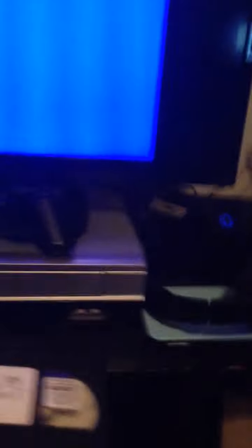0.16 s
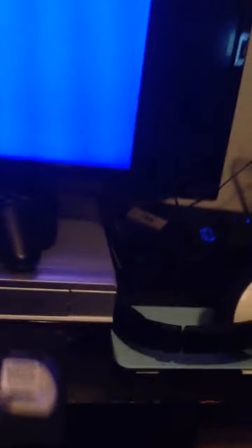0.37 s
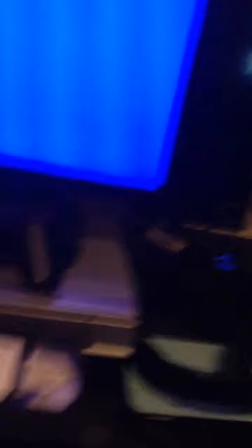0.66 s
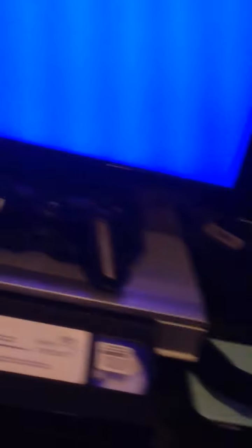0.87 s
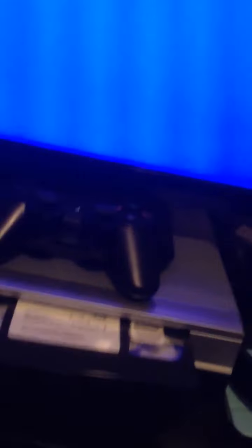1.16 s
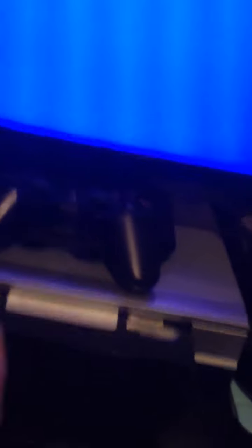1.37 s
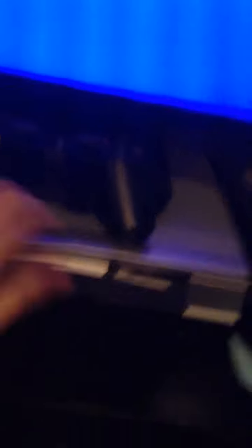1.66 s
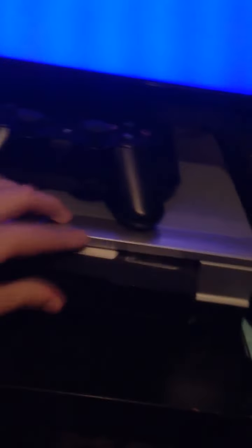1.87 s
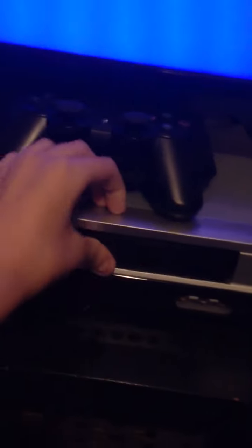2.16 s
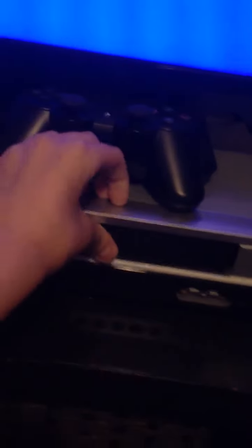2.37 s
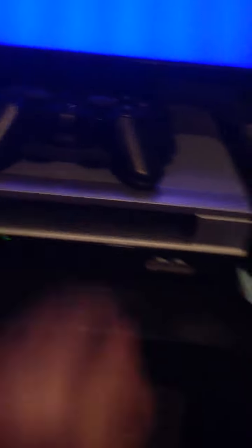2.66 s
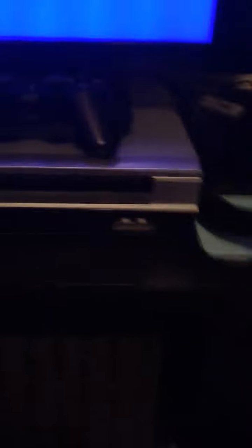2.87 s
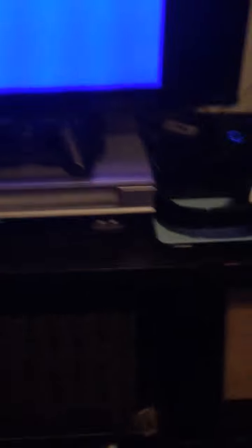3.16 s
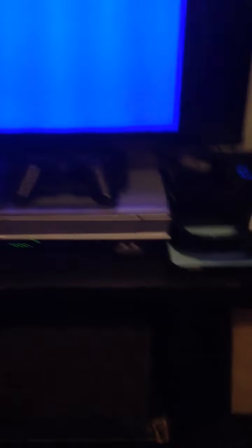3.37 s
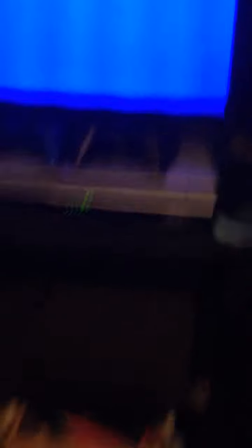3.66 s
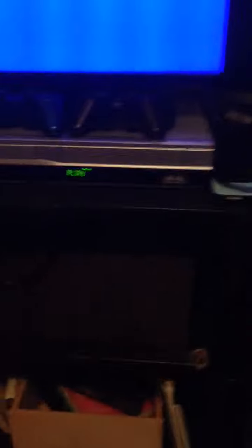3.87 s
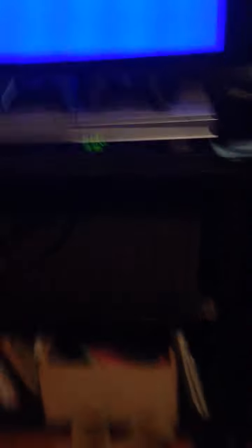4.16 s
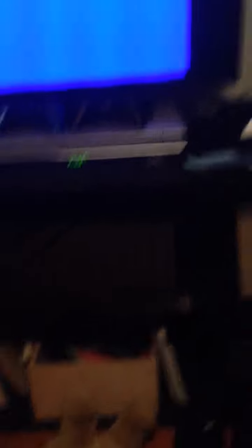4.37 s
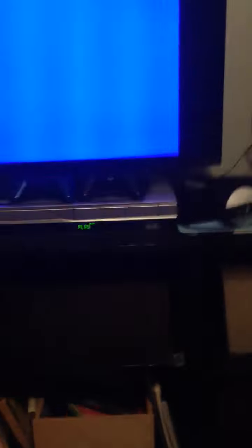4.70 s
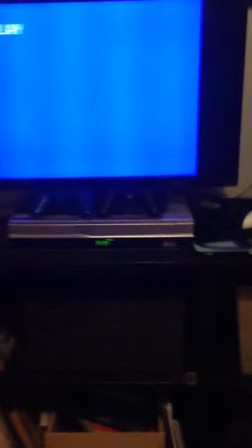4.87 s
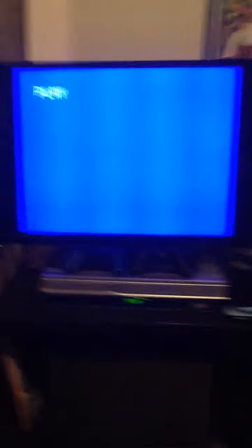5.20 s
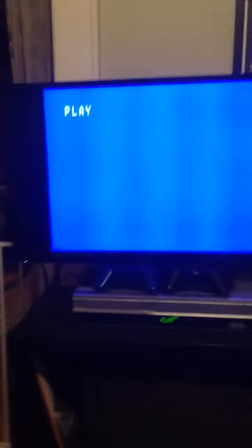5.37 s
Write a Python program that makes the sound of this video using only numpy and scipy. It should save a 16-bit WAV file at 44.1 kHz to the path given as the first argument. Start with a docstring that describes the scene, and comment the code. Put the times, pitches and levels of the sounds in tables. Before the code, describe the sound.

A cassette taps and scrapes into a video deck, the loading mechanism clunks and whirs, then a faint motor whine and soft latch clicks follow.

```python
"""A cassette taps and scrapes its way into a video deck in a small room, close to the microphone.
The carriage draws it in and drops it with a clunk, the tape is threaded, motors spin up, a lever and a latch fall.
Knocks are short noise bursts with ringing tones, scrapes and gears are streams of tiny impacts, squeaks are
narrow noise and the motor is a rising whine. Shelf and room echo; soft bumps, rumble, hiss and hum lie below."""
import sys
import numpy as np
from scipy import signal
from scipy.io import wavfile
from scipy.ndimage import uniform_filter1d

SR = 44100
rng = np.random.default_rng(int(sys.argv[2]) if len(sys.argv) > 2 else 0)


def store_pcm(level_fs):
    """Save levels as 16-bit WAV."""
    pcm = np.round(np.clip(level_fs, -1, 1) * 32767).astype(np.int16)
    wavfile.write(sys.argv[1], SR, np.atleast_2d(pcm).T)


N = 244314  # length of the scene [samples]
TIME = np.arange(N) / SR  # [s]


def amp(db):
    """Turns decibels into a gain."""
    return 10 ** (np.asarray(db) / 20)


def unit(x):
    """Scales a sound to an rms of 1."""
    return x / np.sqrt(np.mean(x ** 2) + 1e-20)


def read(points, hz):
    """Reads a table of (frequency, value) between its rows, on a logarithmic frequency axis."""
    table_hz, value = np.transpose(points)
    return np.interp(np.log(hz + 1), np.log(table_hz), value)


def add(mix, s, sound):
    """Lays a sound into the mix at time s."""
    part = mix[max(round(s * SR), 0):][:len(sound)]
    part += sound[:len(part)]


def band(x, low_hz, high_hz, order=2):
    """Keeps only the frequencies between two edges."""
    edges = [low_hz, np.clip(high_hz, low_hz + 1, SR / 2 - 1)]
    sections = signal.butter(order, edges, "band", fs=SR, output="sos")
    return signal.sosfilt(sections, x)


def colour(x, points, size=4096):
    """Filters with the given spectrum, in minimum phase so that nothing sounds ahead of its cause."""
    hz = abs(np.fft.fftfreq(size, 1 / SR))
    log_gain = np.log(amp(read(points, hz)))
    taps = np.fft.ifft(np.exp(np.conj(signal.hilbert(log_gain)))).real
    return signal.oaconvolve(x, taps[:size // 2])[:N]


def drift(per_s):
    """Random wander of rms 1, with per_s new random points a second joined by straight lines."""
    steps = rng.standard_normal(N)
    return unit(np.interp(TIME * per_s, np.arange(N), steps))


def grains(per_s, spread_db):
    """Tiny impacts at random moments, most small and a few large."""
    size_db = spread_db * np.minimum(rng.exponential(1, N), 4)
    sizes = amp(size_db) * rng.choice([-1, 1], N)
    return unit(sizes * (rng.random(N) < per_s / SR))


def gesture(start, length, shape):
    """Gain of one movement: it rises, sags while it lasts, then falls away."""
    rise, sag, fall = shape
    t = TIME - start
    return amp(rise * np.minimum(t, 0) - sag * np.clip(t, 0, length) - fall * np.maximum(t - length, 0))


def knocks(grit=0.57, size=5000):
    """Each blow sets off a quickly dying rattle, a low tone of the chassis and a short ring of the struck part."""
    # knocks of plastic or mechanism; thud, snap and tick are relative to the clack, before the trims below:
    # (time [s], clack [dB], thud [dB], snap [dB], tick [dB], chassis tone [Hz], ring of the struck part [Hz])
    blow_table = [(0.735, -26.5, -17, 2, -9.5, 285, 4760), (0.769, -31.5, -9, 2.5, -8, 300, 5730),
                  (0.804, -29, -8, -2, -17, 337, 708), (0.827, -24.5, -8, 0.5, -12, 198, 3290),
                  (0.866, -33.5, -2, -4, -27, 355, 654), (1.055, -27, -18, 3, -13, 363, 3360),
                  (1.074, -26.5, -6, 11, 1, 380, 4550), (1.091, -21.5, -30, 2.5, -9, 285, 4610),
                  (1.114, -24, -4, 0, -8, 277, 4670), (1.123, -19, -7, 1.5, -5.5, 364, 1136),
                  (1.251, -35, 6, -6, -30, 254, 1180), (1.315, -40, 7.5, -33, -15, 260, 800),
                  (1.491, -28, -18, 0, -9, 326, 3300), (1.504, -33, -2, 2, -4, 293, 2650),
                  (1.539, -24.5, -2, -3, -4, 310, 1240), (1.798, -37, -0.5, -1, -13, 276, 670),
                  (1.948, -40.5, -16, -7.5, -17, 363, 750), (1.994, -31, -7, 1.5, -29, 327, 2470),
                  (2.088, -22.5, -33, 0, -4, 301, 5350), (2.093, -27.5, -22, 5.5, -12, 360, 780),
                  (2.118, -29, 0.5, 5.5, -1.5, 226, 1320), (2.15, -37, -9, 2, -3, 216, 795),
                  (2.36, -35.5, 6, -10.5, -21, 300, 750), (2.515, -27.5, -9, 7, 0, 401, 3280),
                  (2.521, -23.5, -3, -20, -2.5, 335, 1345), (2.622, -39.5, -5, 0, -12, 286, 1360),
                  (2.748, -41.5, -31, 4, -8, 283, 2100), (2.796, -35, -19, -14, -15, 189, 940),
                  (2.816, -38.5, -1.5, -12, -16, 306, 970), (2.874, -38.5, -20, -21, -30, 345, 1700),
                  (2.898, -35.5, -25, -12, -2, 242, 1350), (2.908, -28.5, -9.5, -6, -24, 322, 1740),
                  (3.012, -25, -39, 4, 2, 342, 4410), (3.031, -16.5, -10.5, -26, -12, 327, 900),
                  (3.038, -22, 1.5, -4, 0, 347, 1370), (3.164, -32.5, -16, 0, -10, 325, 2800),
                  (3.173, -38, 6, 0, -1, 354, 1220), (3.26, -37, -17, -8, -10.5, 284, 980),
                  (4.42, -33.5, 3.5, -10, -40, 266, 2140), (4.428, -44.5, 0, 0, -32, 312, 780),
                  (4.448, -35.5, -18, -9, -36, 250, 794), (4.605, -43.5, -25, 2, -3, 252, 4930)]
    # how thud, clack, snap and tick sound, in that order; the rise is a time constant and t60 the time to fall 60 dB:
    # (low edge [Hz], high edge [Hz], rise [s], t60 [s], trim [dB])
    registers = [(146, 463, 0.0046, 0.11, -5), (524, 2590, 0.001, 0.061, -5.5),
                 (2210, 5760, 0.00039, 0.038, -2.5), (5540, 11700, 0.00037, 0.028, 4.5)]
    s, clack_db, thud_db, snap_db, tick_db, thud_hz, ring_hz = np.transpose(blow_table)[:, :, None]
    t = np.arange(size) / SR

    def swell(rise, t60):
        return (1 - np.exp(-t / rise)) * amp(-60 * t / t60)

    chassis = swell(rise=0.0011, t60=0.062) * np.sin(2 * np.pi * thud_hz * t)
    blows = amp(thud_db - 3.0) * chassis

    # the ring follows the clack, snap or tick level, whichever suits its pitch
    register = np.digitize(ring_hz, [registers[2][0], registers[3][0]])
    ring_db = np.choose(register, [0 * s, snap_db, tick_db])
    ring = swell(rise=0.00029, t60=0.028) * np.sin(2 * np.pi * ring_hz * t)
    blows += amp(ring_db - 3.5) * ring

    for (low, high, rise, t60, trim_db), db in zip(registers, (thud_db, 0, snap_db, tick_db)):
        envelope = swell(rise, t60)
        noise, sizes = rng.standard_normal((len(s), 2, size)).swapaxes(0, 1)
        gritty = noise * np.exp(grit * sizes)  # uneven grain sizes
        rattle = band(gritty * envelope, low, high, order=3)
        # every rattle gets the energy of its envelope
        rattle *= np.linalg.norm(envelope) / np.linalg.norm(rattle, axis=1)[:, None]
        blows += amp(db + trim_db) * rattle

    out = np.zeros(N)
    for start, blow in zip(s[:, 0], amp(clack_db) * blows):
        add(out, start, blow)
    return out


def slide():
    """Plastic sticks and slips on plastic in tiny jerks; each stroke has its own share of treble."""
    # strokes along the slot and the guides, levels before the mix of layers:
    # (start [s], length [s], level [dB], extra level of the hiss [dB])
    strokes = [(1.056, 0.097, -35, 0), (1.22, 0.061, -42, -2.5), (1.308, 0.039, -47, -6.5),
               (1.379, 0.053, -41.5, -4.5), (1.483, 0.017, -40, 1.5), (1.536, 0.067, -49.5, -20),
               (1.993, 0.16, -35.5, -2.5), (2.142, 0.047, -46, 1), (3.011, 0.044, -33, 4.5),
               (3.086, 0.053, -49.5, 1), (3.163, 0.0046, -40.5, 2), (4.428, 0.022, -43, -10)]
    # how every stroke takes hold, eases off and stops: (rise [dB/s], sag [dB/s], fall [dB/s])
    stroke_shape = (790, 33, 560)
    pressure = [amp(db) * gesture(s, length, stroke_shape) for s, length, db, _ in strokes]
    edge = [p * amp(bright_db) for p, (*_, bright_db) in zip(pressure, strokes)]

    grip = amp(1.95 * drift(per_s=130))
    slips = grains(per_s=3000, spread_db=3) * grip
    fine_slips = grains(per_s=2200, spread_db=0.5) * grip
    groan = amp(-7.5) * unit(band(slips, 240, 342))
    rasp = amp(-2.5) * unit(band(slips, 570, 2150))
    hiss = amp(-2.0) * unit(band(fine_slips, 1800, 8200))
    # where strokes overlap, the stronger one counts
    return np.max(pressure, axis=0) * (groan + rasp) + np.max(edge, axis=0) * hiss


def gears():
    """Gear teeth chatter as tiny impacts under the load of the carriage and the threading arms."""
    # runs that first move the carriage, then thread the tape: (start [s], length [s], load before the mix [dB])
    gear_runs = [(2.353, 0.15, -57), (2.522, 0.735, -52), (3.312, 0.2, -58), (3.974, 0.05, -80),
                 (4.35, 0.19, -58.5)]
    # how each run starts, eases and stops: (rise [dB/s], sag [dB/s], fall [dB/s])
    gear_shape = (165, 9.8, 350)
    # tone colour of the chatter: (frequency [Hz], relative level [dB])
    gear_colour = [(60, -51), (220, 9.5), (450, -2.5), (800, -1), (1400, 1), (2300, -8.5), (3200, -6.5),
                   (5500, -10.5), (9000, -11), (15000, -23)]
    load = np.max([amp(db) * gesture(s, length, gear_shape) for s, length, db in gear_runs], axis=0)
    teeth = grains(per_s=2000, spread_db=1.0) * amp(1.2 * drift(per_s=84))
    return load * unit(colour(teeth, gear_colour))


def case(x):
    """The deck's case and the cassette shell ring on at their own pitches."""
    # ringing, with t60 the time to fall 60 dB: (frequency [Hz], t60 [s], level over the direct sound [dB])
    modes = [(218.5, 0.25, -2.5), (336.5, 0.13, 2.5), (440, 0.94, -43), (645, 0.065, 0),
             (746.7, 0.12, -1.5), (985, 0.067, -26), (983, 0.14, -24), (1375, 0.025, -5.5),
             (1856, 0.055, 0), (2134, 0.14, 1), (3000, 0.24, -55), (3940, 0.094, -9), (4340, 0.11, 0.5),
             (4900, 0.075, -35), (5870, 0.055, -34)]
    t = np.arange(SR // 5) / SR
    ringing = np.zeros(len(t))
    for hz, t60, db in modes:
        decay = np.exp(-np.log(1000) * t / t60)
        even = 2 * decay / decay.sum()  # makes long and short rings equally strong at their pitch
        ringing += amp(db) * even * np.cos(2 * np.pi * hz * t)
    return x + signal.oaconvolve(x, ringing)[:N]


def squeaks():
    """Sliding parts rub in narrow bands of noise that swell quickly and fade."""
    # squeaks, sizzles and whirrs of sliding parts and running tape:
    # (start [s], length [s], centre [Hz], width [Hz], level before the swell [dB])
    squeak_table = [(2.428, 0.042, 1360, 219, -48.5), (2.507, 0.13, 1315, 260, -44),
                    (2.68, 0.12, 5560, 1100, -61), (2.752, 0.11, 9600, 1000, -58.5),
                    (3.251, 0.15, 7800, 2830, -54), (4.264, 0.6, 1850, 1010, -60.5),
                    (4.599, 0.099, 4880, 700, -61.5), (4.6, 0.062, 2720, 1710, -53.5),
                    (4.919, 0.39, 2980, 4320, -62.5), (5.251, 0.55, 874, 613, -65.5)]
    out = np.zeros(N)
    for s, length, hz, width, db in squeak_table:
        progress = np.linspace(0, 1, int(length * SR))
        noise = band(rng.standard_normal(SR), max(hz - width / 2, 100), hz + width / 2)
        friction = unit(noise[-len(progress):])
        swell = np.sin(np.pi * np.sqrt(progress))
        add(out, s, amp(db) * friction * swell)
    return out


def whine():
    """A rough motor whine rises towards top speed with each push; a second shaft adds a weaker strand above it."""
    # pushes that spin the motor up: (start [s], length [s], starting pitch [Hz], level before the fades [dB])
    spin_ups = [(3.966, 0.062, 1128, -67), (4.227, 0.27, 1020, -63)]
    # how each push swells, sags and fades: (rise [dB/s], sag [dB/s], fall [dB/s])
    spin_shape = (170, 15, 100)
    top_speed_hz, spin_up_s = 1740, 0.27  # the pitch closes in on this top with this time constant

    def strand(phase, steady):
        rough = drift(per_s=130) * np.sin(phase) + drift(per_s=130) * np.cos(phase)
        return steady * np.sin(phase) + rough

    out = np.zeros(N)
    for s, length, start_hz, db in spin_ups:
        lag = np.exp(-np.maximum(TIME - s, 0) / spin_up_s)
        hz = top_speed_hz + (start_hz - top_speed_hz) * lag
        turn = 2 * np.pi * np.cumsum(hz) / SR
        tone = unit(strand(turn, steady=0.9) + amp(-8) * strand(1.7 * turn, steady=0.5))
        out += amp(db) * gesture(s, length, spin_shape) * tone
    return out


def stand(x):
    """The wooden stand under the deck rumbles with whatever shakes it, less than in proportion."""
    shake = np.sqrt(abs(uniform_filter1d(x ** 2, size=1500)) + 1e-14)
    rumble = unit(band(rng.standard_normal(N), 41.0, 137))
    return amp(-36.5) * shake ** 0.56 * rumble


def bumps(rise=0.0114):
    """The hand and the furniture give dull thumps: low noise that swells in rise seconds and dies away."""
    # soft low bumps: (time of the swell's peak [s], level [dB])
    bump_table = [(0.097, -51.5), (0.388, -52), (0.484, -50), (0.97, -51.5), (1.65, -51.5), (2.87, -43.5),
                  (3.197, -40), (4.081, -57), (4.436, -48), (5.411, -49)]
    out, t = np.zeros(N), np.arange(SR // 4) / SR
    shape = t / rise * np.exp(1 - t / rise)
    for s, db in bump_table:
        thump = band(rng.standard_normal(len(t)) * shape, 48, 176)
        add(out, s - rise, amp(db) * unit(thump) * np.sqrt(np.mean(shape ** 2)))
    return out


def reflections(x, t60s, delay):
    """Dense echoes fade in between one and two delays, each band dying at its own speed."""
    hz, t, z = signal.stft(rng.standard_normal(SR // 2), SR, nperseg=256)
    decay = amp(-60 * t / read(t60s, hz)[:, None])
    tail = signal.istft(z * decay, SR, nperseg=256)[1]
    tail *= np.clip(np.arange(len(tail)) / SR / delay - 1, 0, 1)
    return signal.oaconvolve(x, tail / np.linalg.norm(tail))[:N]


def air():
    """Uneven room rumble, microphone hiss and a faint wavering hum, all from noise and one sine."""
    # tone colour of the hiss: (frequency [Hz], relative level per Hz [dB])
    hiss_colour = [(20, -28), (60, -27), (130, -13), (230, -3.5), (340, -10.5), (500, -13.5), (640, -13),
                   (950, -16), (2060, -18), (2700, -22.5), (4200, -22.5), (7000, -26.5), (15000, -29)]
    hiss = unit(colour(rng.standard_normal(N), hiss_colour))
    rumble = unit(band(rng.standard_normal(N), 69, 324)) * amp(4.7 * drift(per_s=11))
    hum = np.sin(2 * np.pi * 215 * TIME + 1.7 * drift(per_s=10.0)) * amp(0.28 * drift(per_s=4.4))
    return amp(-61.5) * hiss + amp(-69.5) * rumble + amp(-75.5) * hum


def scene():
    """The deck sounds directly, off the narrow shelf around it (which reflects no bass), and in the room."""
    # how long echoes take to fall 60 dB in the room: (frequency [Hz], t60 [s])
    room_t60s = [(150, 0.35), (500, 0.3), (1500, 0.27), (5000, 0.24), (9000, 0.17), (15000, 0.19)]
    shelf_t60s = [(300, 0.22), (4000, 0.082), (12000, 0.066)]  # (frequency [Hz], t60 [s])
    deck = amp(-0.5) * case(knocks() + slide() + gears()) + squeaks() + whine()
    shelf = band(reflections(deck, shelf_t60s, delay=0.001), 430, 12000)
    room = reflections(deck, room_t60s, delay=0.0093)
    return (deck + amp(-9.5) * shelf + amp(-13.5) * room + stand(deck) + bumps())[None]


def record(dry):
    """The microphone colours the scene, the noise floor joins in, and the highest treble is cut off."""
    # microphone response: (frequency [Hz], gain [dB])
    mic = [(40, -9.5), (120, -1.5), (260, 1), (500, -1), (800, 1), (1600, -3), (3000, -1.5), (5000, -1.5),
           (8000, -3), (12000, -8), (15500, 0)]
    edge_hz = 15600
    heard = colour(dry[0], mic) + air()
    low_pass = signal.firwin(401, edge_hz, window=("kaiser", 7), fs=SR)
    return signal.oaconvolve(heard, low_pass, "same")[None]


dry = scene()
out = record(dry)
store_pcm(out)
```